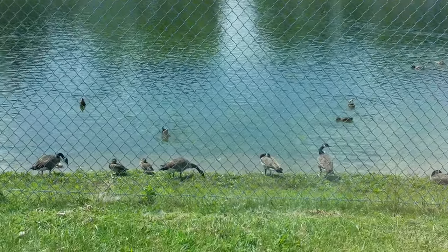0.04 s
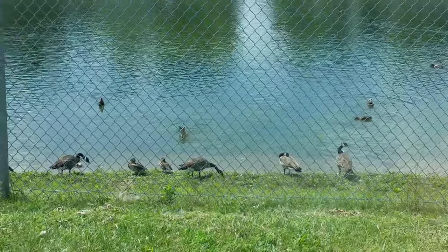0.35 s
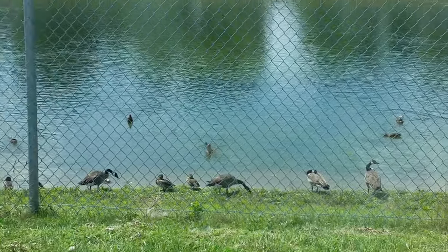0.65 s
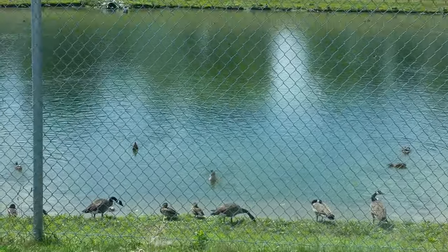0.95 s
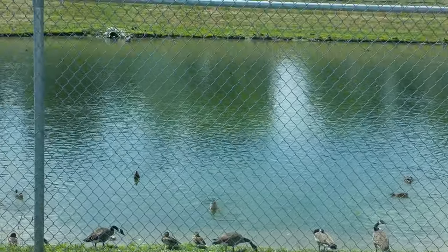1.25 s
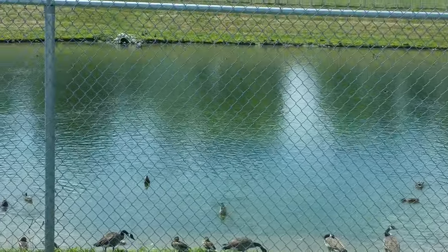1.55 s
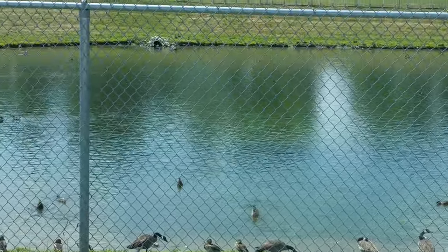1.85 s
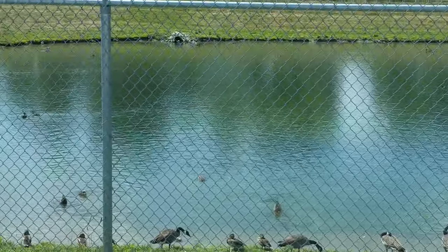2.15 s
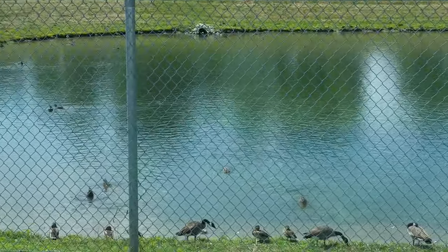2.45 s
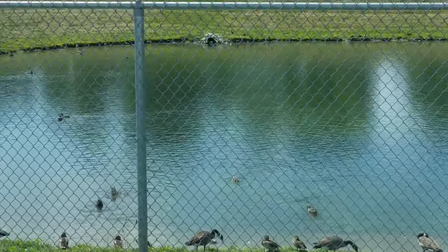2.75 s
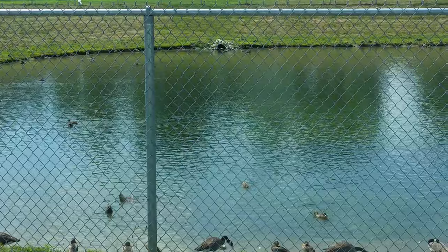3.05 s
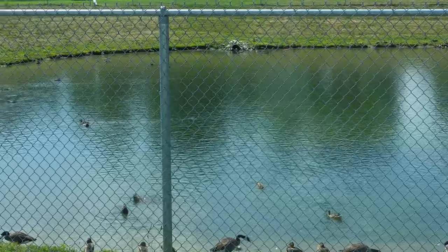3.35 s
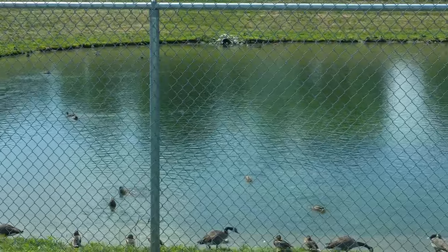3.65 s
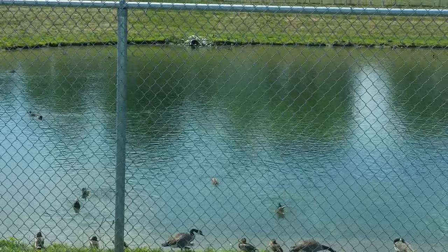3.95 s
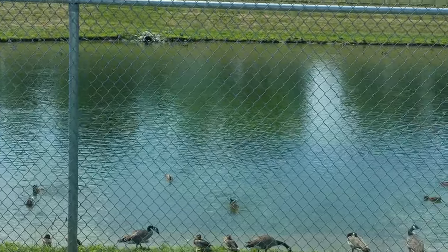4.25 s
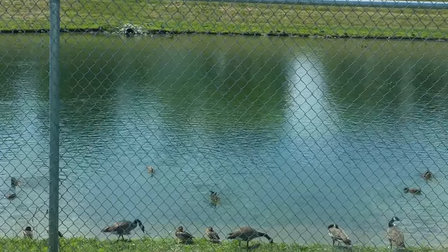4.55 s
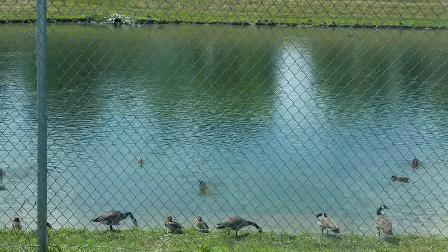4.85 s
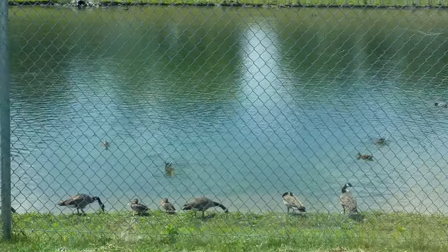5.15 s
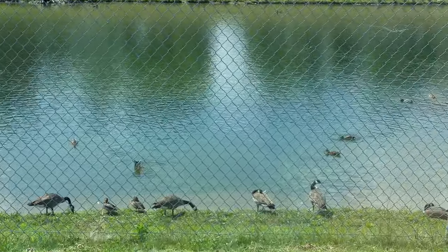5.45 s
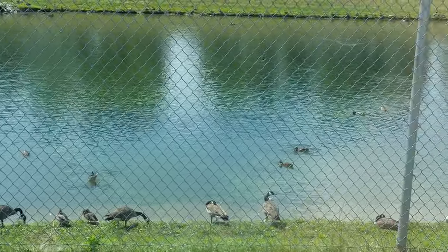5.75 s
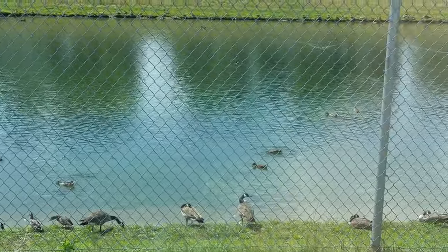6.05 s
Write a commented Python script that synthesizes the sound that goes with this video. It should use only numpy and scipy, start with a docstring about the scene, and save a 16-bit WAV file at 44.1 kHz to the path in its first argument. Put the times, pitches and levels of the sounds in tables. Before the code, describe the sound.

A car engine idles with a deep, boomy rumble inside the cabin while the air blower hums and hisses softly.

```python
"""A car idles beside a pond, heard from inside. From the start the engine throbs deep under a boomy
rumble, the blower hums in its ducts and a narrow hiss of air stands on the left. A finger rustles
on the hand-held camera at once, and a few faint ticks follow in the first 1.6 s. Near 0.9 s the idle
makes the first of five small surges, each weakening the throb. Rumble, blower and the camera's
own thin noise hold to the end."""
import sys
import numpy as np
from scipy.fft import rfft, irfft, next_fast_len
from scipy.io import wavfile
from scipy.ndimage import map_coordinates

SR = 44100
rng = np.random.default_rng(int(sys.argv[2]) if len(sys.argv) > 2 else 0)


def inscribe(sig):
    """Save sig as 16-bit PCM at rate SR to the path in sys.argv[1].

    A 1-D sig is mono; a 2-D sig holds one channel per row.
    Samples are clipped to [-1, 1] before scaling.
    """
    pcm = np.round(np.clip(np.atleast_2d(sig).T, -1, 1) * 32767)
    wavfile.write(sys.argv[1], SR, pcm.astype(np.int16))


N = 272979


# Partials of the firing. Each row: multiple of the firing rate, relative level in dB.
FIRING_PARTIALS = [(.5, -28.5), (1, -0.5), (2, -9.5), (4, -16), (9, -25.5), (10, -28.5)]

def engine(idle_hz=36.12, idle_db=-27, fade_db_per_hz=5, waver_db=2):
    """The firing throb, weaker during each surge; its overtones waver with uneven combustion."""
    rise_hz = surge_hz()
    phase = 2 * np.pi * np.cumsum(idle_hz + rise_hz) / SR
    throb = 0
    for multiple, db in FIRING_PARTIALS:
        gain = amp(db + waver_db * (multiple != 1) * wobble(7))
        throb += gain * np.sin(multiple * phase + rng.uniform(0, 2 * np.pi))
    return np.sqrt(2) * amp(idle_db - fade_db_per_hz * rise_hz) * throb


# Idle surges. Each row: peak time in seconds, length in seconds, rise of the firing rate in Hz.
IDLE_SURGES = [(0.865, 1.154, 0.78), (2.105, 1.485, 0.38), (2.692, 0.61, 0.78), (4.35, 0.8, 0.46),
               (5.55, 1.47, 0.56)]

def surge_hz():
    """The idle hunts: the firing rate rises above rest and settles back in smooth humps."""
    return sum(rise_hz * np.cos(np.pi * np.clip((clock() - peak_s) / length_s, -.5, .5)) ** 2
               for peak_s, length_s, rise_hz in IDLE_SURGES)


# Rumble spectrum. Each row: frequency in Hz, relative density in dB.
RUMBLE_SPECTRUM = [(20, -24.5), (32, -11), (48, -4.5), (62, -1), (105, 0.0), (128, -2.0), (160, -0.5),
                   (205, -5.5), (235, -10), (270, -11), (320, -6), (400, -18.5), (500, -27), (750, -78)]
# Rumble balance. Each row: frequency in Hz, left over right in dB.
RUMBLE_BALANCE = [(120, -0.5), (170, 1.3), (320, 1), (400, 6.5), (500, 3)]
# Rumble likeness in the two channels. Each row: frequency in Hz, correlation.
RUMBLE_CORRELATION = [(60, 0.99), (140, 1), (200, 0.96), (310, 0.95), (400, .85), (480, 0.13), (700, 0.052)]
# Air resonances of the cabin. Each row: centre in Hz, width in Hz, relative level in dB,
# left over right in dB, left lead in radians.
CABIN_MODES = [(142.4, 9, -36.5, 1, 0), (160.5, 14, -35, 0, .1), (204.4, 9, -47, 1, .1),
               (321.3, 29.3, -41.5, 1, 0.055), (444.5, 18, -55, 10, 0.26)]

def rumble(body_db=-28, boom_trim_db=-1, swell_db=-0.33):
    """Low, nearly mono noise of engine and fan, booming in the cabin."""
    body = amp(body_db) * rush(RUMBLE_SPECTRUM, RUMBLE_BALANCE, RUMBLE_CORRELATION)
    boom = amp(boom_trim_db) * modes(CABIN_MODES)
    return (body + boom) * amp(swell_db * wobble(2.3))


# Draught and hiss spectra. Each row: frequency in Hz, relative density in dB.
DRAUGHT_SPECTRUM = [(260, -33.5), (450, -14.5), (496, -22), (555, -8), (645, -7), (749, -12.5), (952, -11),
                    (1520, -16), (1760, -19.5), (2700, -28.5), (3510, -66.5), (5940, -120)]
HISS_SPECTRUM = [(1800, -57), (2650, -23), (3000, -11.0), (3500, -6.5), (4100, 0.5), (4600, -5.0),
                 (5500, -14.5), (6200, -27.5), (6900, -28), (7700, -26.5), (8500, -43.5), (9500, -70.5)]
# Hiss balance. Each row: frequency in Hz, left over right in dB.
HISS_BALANCE = [(2500, 5.7), (3000, 12), (3500, 18), (4100, 26), (4600, 23), (5500, 18), (6200, 17),
                (7600, 14), (8600, 4)]
# Duct resonances. Each row: centre in Hz, width in Hz, relative level in dB,
# left over right in dB, left lead in radians.
DUCT_MODES = [(547, 42, -57.5, 3.5, 1.67), (751.5, 58, -57, -3.5, 1.5), (883, 47, -65.5, -9.5, -1.5),
              (1037, 86, -61.5, -0.5, -2.5), (1217, 80, -65, -5, -1), (1378, 75, -62, 2, -2),
              (1488, 44, -59.5, 1, -2), (1600, 54, -67, -3, 0.54), (1786, 76, -72, -3.5, -2),
              (1950, 110, -72, 6, 4)]

def blower(draught_db=-54, duct_trim_db=-1, hiss_db=-52.5):
    """Blown air: a diffuse draught, the hollow hum of the ducts and a close hiss on the left."""
    draught = amp(draught_db) * rush(DRAUGHT_SPECTRUM)
    hum = amp(duct_trim_db) * modes(DUCT_MODES)
    hiss = amp(hiss_db) * rush(HISS_SPECTRUM, HISS_BALANCE)
    return draught + hum + hiss


# Finger friction spectrum. Each row: frequency in Hz, relative density in dB.
RUSTLE_SPECTRUM = [(2000, -30.5), (3800, -2.5), (6300, -15), (7700, -5.5), (9000, -13), (11800, -3.5),
                   (14000, -2.5), (16000, -10.5)]

def finger_slide(peak_s=0.056, attack_s=0.06, stroke_db=-62, stroke_t60_s=0.22,
                 drag_db=-68, drag_t60_s=1.3):
    """A finger rubs the camera on the right: a quick stroke and a lighter drag that dies slowly."""
    age_s = clock() - peak_s
    attack = np.clip(1 + age_s / attack_s, 0, 1)
    decay_s = np.maximum(age_s, 0)
    stroke = amp(stroke_db - 60 * decay_s / stroke_t60_s)
    drag = amp(drag_db - 60 * decay_s / drag_t60_s)
    return attack * (stroke + drag) * rush(RUSTLE_SPECTRUM) * placed(side_db=-9)


# Contacts in the hand. Each row: start in seconds, level in dB, centre in Hz, width in Hz,
# 60 dB decay time in seconds, left over right in dB.
GRIP_TICKS = [(.004, -41, 606, 120, 0.14, 5), (0.879, -38.5, 1100, 483, 0.038, 7),
              (.896, -66.5, 7530, 503, .12, -8), (1.556, -60, 12040, 5000, .016, -6)]

def grip_ticks(attack_s=0.002):
    """The camera ticks in the grip; each soft contact takes a moment to build, then dies away."""
    out = np.zeros((2, N))
    for start_s, db, centre_hz, width_hz, t60_s, side_db in GRIP_TICKS:
        age_s = np.maximum(clock() - start_s, 0)
        attack = 1 - np.exp(-(age_s / attack_s) ** 2)
        decay = amp(db - 60 * age_s / t60_s)
        out += attack * decay * resonance(centre_hz, width_hz, side_db)
    return out


# Microphone noise spectrum. Each row: frequency in Hz, relative density in dB.
MIC_SPECTRUM = [(6000, -11), (8500, -13), (10400, -12), (11600, 0.5), (13000, -4), (15700, 0.5)]

def camera_noise(noise_db=-72.5, whine_hz=11652, whine_db=-93):
    """The camera's own faint noise and thin electronic whine."""
    whine = amp(whine_db) * resonance(whine_hz, width_hz=8, side_db=-3)
    return amp(noise_db) * rush(MIC_SPECTRUM) + whine


def modes(table):
    """Resonances stirred by turbulent air."""
    return sum(amp(db) * resonance(centre_hz, width_hz, side_db, lead_rad)
               for centre_hz, width_hz, db, side_db, lead_rad in table)


def resonance(centre_hz, width_hz, side_db, lead_rad=0):
    """Noise of rms 1 in a steep-sided resonance; its standing wave has its own phase on each side."""
    peak = lambda hz: 1j * hz * width_hz / (centre_hz ** 2 - hz ** 2 + 1j * hz * width_hz)
    skirt = lambda hz: 1 / (1 + ((hz - centre_hz) / (2 * width_hz)) ** 2)
    sides = placed(side_db) * np.exp(np.array([[.5j], [-.5j]]) * lead_rad)
    return unit(filtered(rng.standard_normal(N), lambda hz: peak(hz) * skirt(hz) * sides))


def rush(spectrum, balance=((1000, 0),), correlation=((1000, 0),)):
    """Stereo noise of rms 1, centred and uncorrelated by default."""
    mix_rad = lambda hz: np.arccos(np.clip(along(correlation, hz), -1, 1)) / 2
    colour = lambda hz: amp(along(spectrum, hz)) * [np.cos(mix_rad(hz)), np.sin(mix_rad(hz))]
    mid, side = filtered(rng.standard_normal((2, N)), colour)
    stereo = np.array([mid + side, mid - side])
    return unit(filtered(stereo, lambda hz: placed(along(balance, hz))))


def filtered(x, response):
    """x through a complex frequency response."""
    size = next_fast_len(N + SR // 2)
    hz = np.fft.rfftfreq(size, 1 / SR)
    return irfft(rfft(x, size) * response(hz), size)[..., :N]


def placed(side_db):
    """Constant-power stereo gains; positive is left."""
    gains = amp(np.array([[.5], [-.5]]) * side_db)
    return gains / np.sqrt(np.mean(gains ** 2, axis=0))


def wobble(knots_per_s):
    """A smooth random curve."""
    knots = rng.standard_normal(int(N * knots_per_s / SR) + 4)
    return map_coordinates(knots, [clock() * knots_per_s])


def along(points, hz):
    """Interpolates (Hz, value) points on a log axis."""
    knots_hz, values = np.transpose(points)
    return np.interp(np.log(hz + 1), np.log(knots_hz + 1), values)


def amp(db):
    """Decibels to gain."""
    return 10 ** (np.asarray(db) / 20)


def unit(x):
    """x at rms 1."""
    return x / np.sqrt(np.mean(x ** 2) + 1e-20)


def clock():
    """Sample times in seconds."""
    return np.arange(N) / SR


def scene():
    """The sound in the cabin, in stereo."""
    return engine() + rumble() + blower() + finger_slide() + grip_ticks()


def record(dry, top_hz=15760, fade_s=0.002):
    """Adds the camera's noise, fades both ends and cuts everything above the band limit."""
    edge_s = np.minimum(clock(), clock()[::-1])
    fade = np.minimum(edge_s / fade_s, 1)
    return filtered(fade * (dry + camera_noise()), lambda hz: hz < top_hz)


dry = scene()
out = record(dry)
inscribe(out)
```